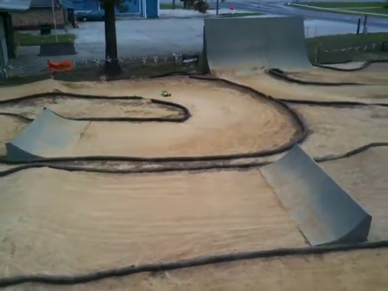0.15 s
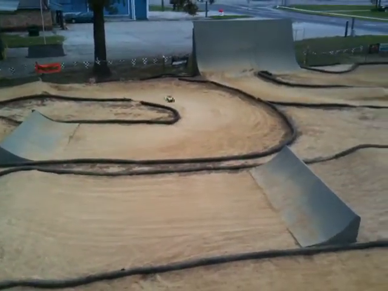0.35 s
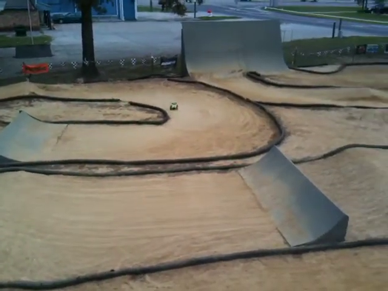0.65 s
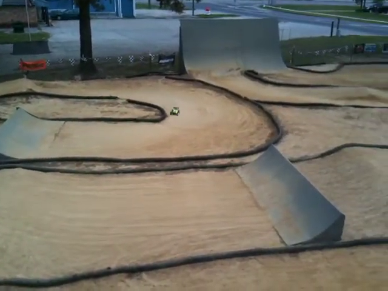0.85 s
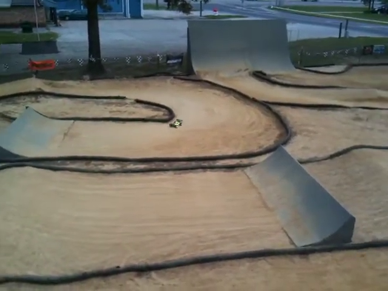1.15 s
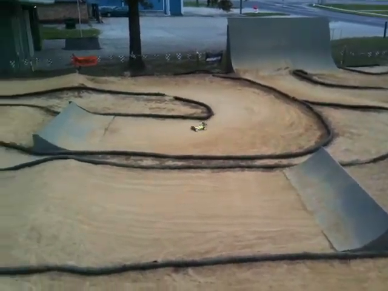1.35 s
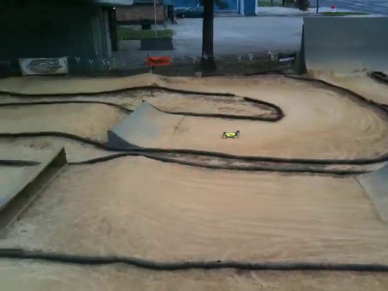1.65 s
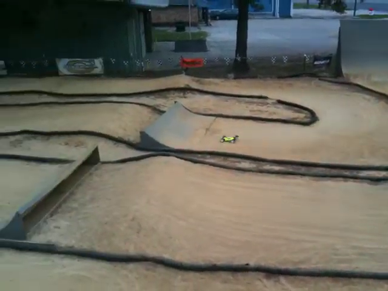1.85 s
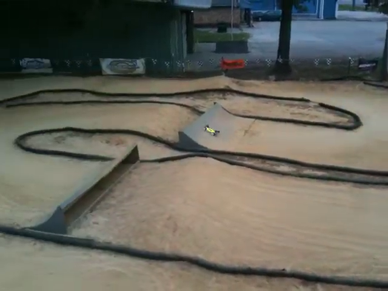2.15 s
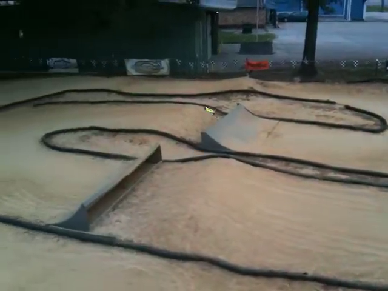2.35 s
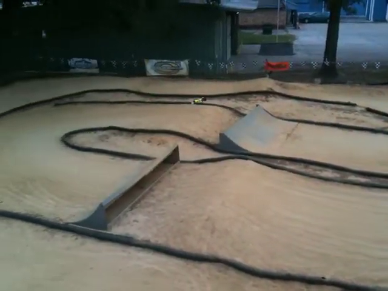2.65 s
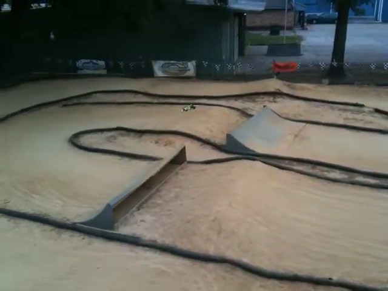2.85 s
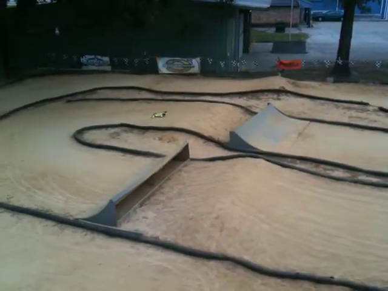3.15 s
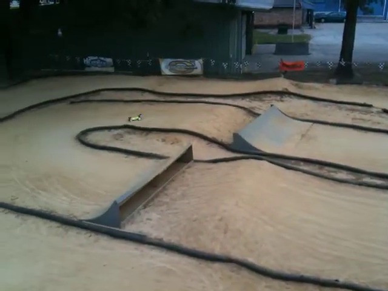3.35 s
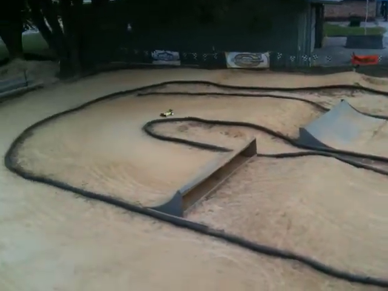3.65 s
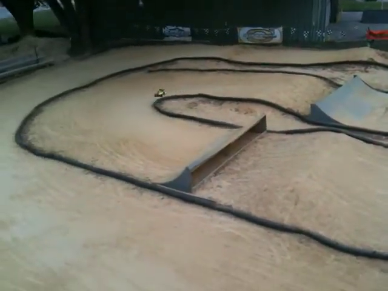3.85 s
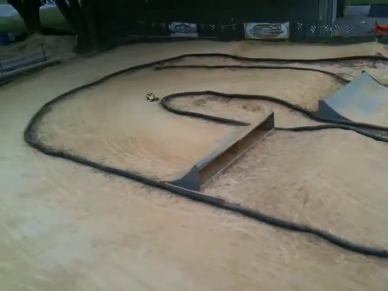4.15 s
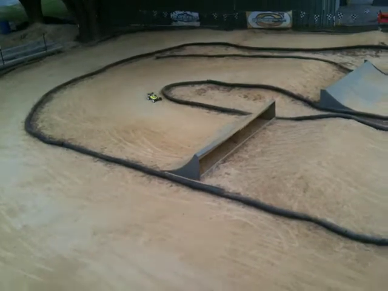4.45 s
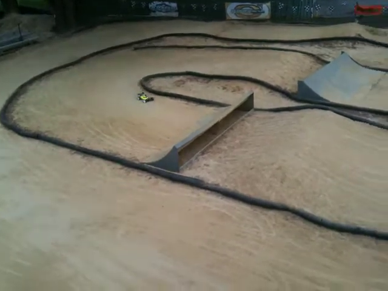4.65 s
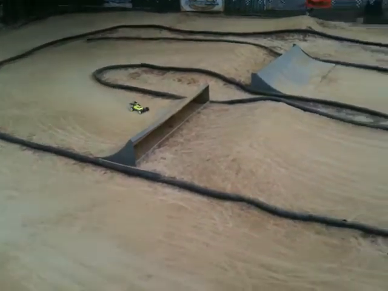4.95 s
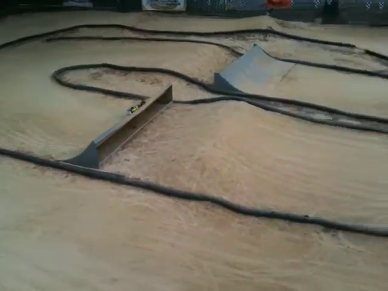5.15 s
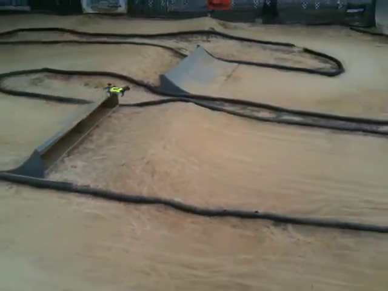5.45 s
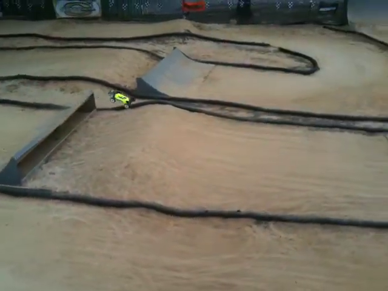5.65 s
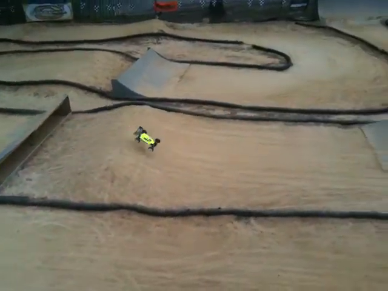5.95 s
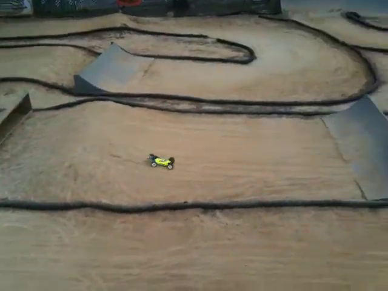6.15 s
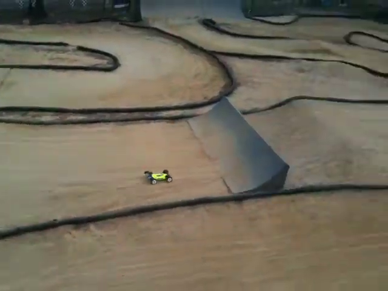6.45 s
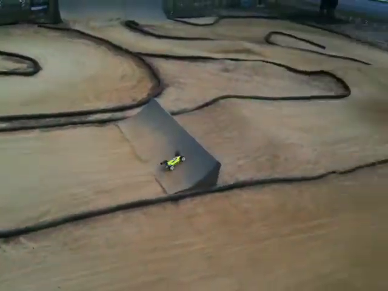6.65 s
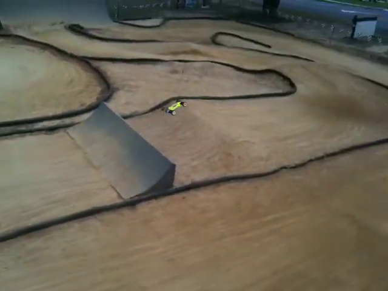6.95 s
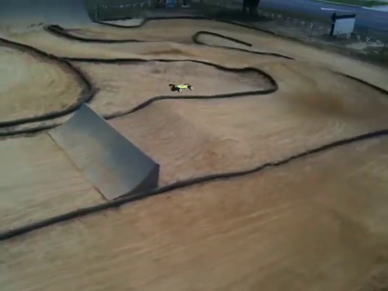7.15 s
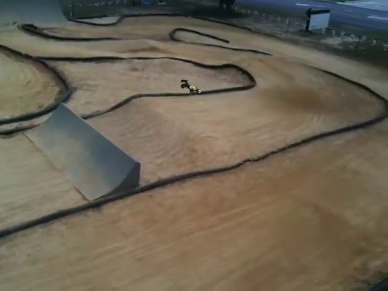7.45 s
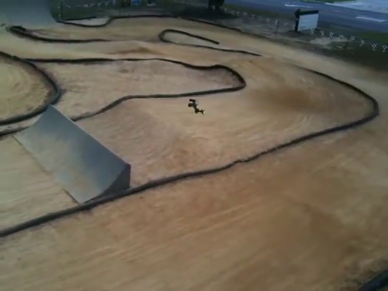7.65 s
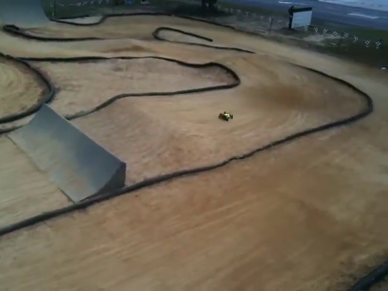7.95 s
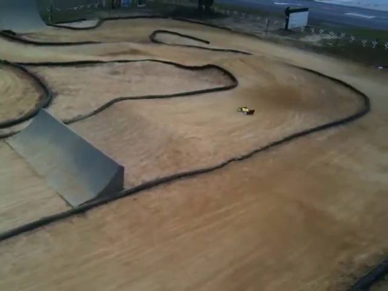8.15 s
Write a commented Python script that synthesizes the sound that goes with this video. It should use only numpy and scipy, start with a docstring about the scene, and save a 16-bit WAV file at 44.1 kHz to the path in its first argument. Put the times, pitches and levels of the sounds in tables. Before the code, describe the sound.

A small electric remote-control buggy buzzes and rasps in throttle bursts, clattering over jumps as wind puffs on the microphone.

```python
"""Electric buggy on a dirt track

A small buggy laps a track. With each squeeze of the throttle its gear teeth drive the chassis
resonances into a growl and a rasp; a faint, very high whine near 15 kHz follows the rasp. The motor
squeals on short blips and the body clatters over ramps. Gusts puff on the microphone, a thin, faint
whistle near 4.5 kHz swells twice, and far traffic hums."""
import sys
import numpy as np
from scipy import signal
from scipy.fft import rfft, irfft, next_fast_len
from scipy.io import wavfile
from scipy.ndimage import uniform_filter1d, map_coordinates

SR = 44100
rng = np.random.default_rng(int(sys.argv[2]) if len(sys.argv) > 2 else 0)


def master_out(mix):
    """Clip the mix to full scale and print it as 16-bit PCM to the path in sys.argv[1]."""
    frames = np.transpose(np.atleast_2d(mix))
    ceiling = np.clip(frames, -1, 1)
    pcm = np.round(ceiling * 32767).astype(np.int16)
    wavfile.write(sys.argv[1], SR, pcm)


N = 366030

# gear noise between the resonances: (frequency [Hz], spectral level [dB])
GEAR_SPECTRUM = [(300, -40), (420, -5), (600, -12), (1500, -12), (2600, -16), (3200, -21), (8500, -22),
                 (11000, -23), (15500, -36)]
SPLIT_HZ = 2840  # growl below, rasp above


def drivetrain():
    """Forced vibration: uneven tooth impacts excite the chassis; wheels and ruts modulate the level."""
    # a faint, very high whine: (time [s], frequency [Hz], level relative to the rasp [dB])
    high_whine = [(0, 14900, -19), (3.2, 15400, -18), (4.2, 15000, -16), (5, 15350, -14),
                  (5.75, 15100, -10), (6.5, 14900, -22), (7.27, 15550, -10), (7.5, 15000, -13),
                  (7.9, 14550, -16), (8.3, 14600, -22)]
    slack_db, loaded_db = -62, -54  # rasp levels between which the body starts to ring
    rasp_level, growl_level = throttle()
    hard_strike = rng.random(N) < .05
    teeth = np.where(hard_strike, amp(3.6 * rng.standard_normal(N)), 1)
    shake_db = 0.52 * wobble(35) + 1.13 * wobble(90)
    grind = teeth * patchy(depth_db=3)
    growl, ringing = chassis(grind)
    load = np.clip(np.log(rasp_level / amp(slack_db) + 1e-9) / np.log(amp(loaded_db - slack_db)), 0, 1)
    hiss = unit(filtered(grind, lambda hz: along(GEAR_SPECTRUM, hz) * (hz >= SPLIT_HZ)))
    rasp = load * ringing + (1 - load) * hiss  # slack gears only hiss
    whine_hz, whine_db = curves(high_whine)
    whine = unit(wobble(900) * amp(1.3 * wobble(25))) * tone(whine_hz)
    whine *= amp(whine_db + 1.6 * wobble(12))
    return amp(shake_db) * (rasp_level * (rasp + whine) + growl_level * growl)


def throttle():
    """Gear noise grows with load: rasp and growl envelopes rise, hold, drop at lift-off and coast."""
    # (on [s], off [s], first rasp level [dB], level at lift-off [dB], growl relative to rasp [dB])
    squeezes = [(0, 0.205, -57, -56, -1.5), (0.194, 0.476, -46.5, -49, 0), (0.641, 0.787, -49, -46.5, -1),
                (1.093, 1.197, -54, -54, 2), (1.292, 1.394, -53, -52.5, 5), (1.444, 1.793, -52.5, -54, 4),
                (1.75, 2.17, -48, -48.5, 4.5), (2.659, 2.746, -50.5, -51, 2), (2.88, 3.042, -51, -53, 0.5),
                (3.07, 3.26, -45.5, -52.5, 6), (3.695, 3.977, -53.5, -59, 0), (3.942, 4.25, -53.5, -48, 1),
                (4.198, 4.843, -48, -50, 3.5), (4.822, 5.145, -46.5, -48.5, 5.5), (5.2, 5.362, -54, -56, 4),
                (5.668, 5.742, -56, -51.5, 2.5), (5.863, 5.982, -61, -58, 9), (5.986, 6.558, -43, -41, 3),
                (6.67, 6.839, -50, -52, 5.5), (7.214, 7.276, -50, -48.5, 0.5),
                (7.372, 7.825, -59.5, -47.5, -1), (7.825, 8.14, -40, -44.5, 0), (8.203, 8.3, -58, -62, 8)]
    spin_up_s, spin_up_db = 0.056, 8.5
    lift_db_per_s, coast_db, coast_db_per_s = 150, -5.5, 43
    roll_db = -60.5  # growl while the wheels merely roll
    t = np.arange(0, N + 64, 64) / SR
    on, off, first_db, last_db, growl_db = np.transpose(squeezes)[..., None]
    held = np.clip((t - on - spin_up_s) / np.maximum(off - on - spin_up_s, .01), 0, 1)
    bite_db = spin_up_db * np.clip(1 - (t - on) / spin_up_s, 0, 1) * (on > 0)
    after = np.maximum(t - off, 0)
    fade_db = np.maximum(-lift_db_per_s * after, coast_db - coast_db_per_s * after)
    rasp = (t >= on) * amp(first_db + held * (last_db - first_db) - bite_db + fade_db)
    growl = np.maximum((rasp * amp(growl_db)).max(axis=0), amp(roll_db))
    return [np.interp(np.arange(N) / SR, t, level) for level in (rasp.max(axis=0), growl)]


def chassis(force):
    """Modal radiation: each side of the body has its own timbre. Returns the low and the high band."""
    # (frequency [Hz], bandwidth [Hz], level from nose [dB], flank [dB], quarter [dB], tail [dB])
    modes = [(430, 90, -25, -25, -25, -6.5), (931, 327, -3.5, 11, 4.5, -1), (1162, 410, -2, -2, 4, -8),
             (1714, 164, 0.5, -1, 5, -2.5), (1948, 315, 2.5, 6, 4.5, -10), (2264, 330, 2.5, 3.5, 0.5, -10),
             (2483, 250, -14, -16, 2, -5), (3160, 760, -10, -7.5, -26, -13.5),
             (3970, 440, -3.5, -6.5, -12.5, -9.5), (4700, 570, -11.5, -13, -10, -12),
             (5300, 340, -12, -7.5, -9.5, -32), (5980, 990, -8.5, -10, -12.5, -15),
             (6930, 290, -7, -7, -11, -7), (7440, 190, -12, -8.5, -18, -15),
             (7580, 350, -11.5, -11, -12, -11.5), (8230, 360, -20, -11, -17.5, -10),
             (9340, 1400, -14.5, -17, -17.5, -24)]
    # (time [s], side facing the listener [0 nose, 1 flank, 2 quarter, 3 tail])
    headings = [(0, 0), (.95, 0), (1.1, 1), (3.3, 1), (3.8, 2), (4.8, 2), (4.9, 1.4), (5.8, 2), (5.95, 3),
                (7.0, 3), (7.2, 2)]
    heading, = curves(headings)
    low, high = np.zeros(N), np.zeros(N)
    for side in range(4):
        def response(hz):
            power = sum(amp(2 * db[side]) / (1 + (2 * (hz - centre) / width) ** 2) ** 2
                        for centre, width, *db in modes)
            return np.sqrt(power + along(GEAR_SPECTRUM, hz) ** 2) * [hz < SPLIT_HZ, hz >= SPLIT_HZ]
        share = np.clip(1 - np.abs(heading - side), 0, 1)
        body = filtered(force, response)
        low += share * unit(body[0])
        high += share * unit(body[1])
    weave_m = .06
    heard = np.arange(N) + weave_m / 343 * SR * wobble(6)  # Doppler shift as the buggy weaves
    return [map_coordinates(band, [heard], mode='mirror') for band in (low, high)]


def squeals():
    """Frequency modulation: on throttle blips a fuzzy, fluttering tone glides with the motor's speed."""
    # (time [s], duration [s], start frequency [Hz], end frequency [Hz], level [dB])
    blips = [(1.104, 0.1, 6550, 7400, -53), (1.32, 0.066, 6700, 7900, -56), (1.87, 0.28, 5330, 5000, -53.5),
             (3.716, 0.064, 5400, 7200, -61), (3.759, .11, 7340, 7600, -56),
             (4.194, 0.124, 1800, 1687, -48), (4.655, 0.056, 2800, 2400, -50), (5.68, .11, 9900, 9800, -56),
             (6.304, 0.1, 1800, 1600, -40)]
    out = np.zeros(N + SR)
    fuzz = unit(wobble(600))
    flutter = .018 / 7000 * wobble(200)  # about 1.8 % at 7 kHz; high squeals flutter most
    for s, length, start_hz, end_hz, db in blips:
        at, n = round(s * SR), round(length * SR)
        hz = np.linspace(start_hz, end_hz, n)
        glide = tone(hz * (1 + hz * flutter[at:at + n]))
        out[at:at + n] += amp(db) * np.sqrt(np.hanning(n)) * glide
    return out[:N] * (.8 + .6 * fuzz)


def clatter():
    """Impact excitation: ramps and ruts make the plastic chassis rattle, ring and thud, then decay."""
    # (time [s], level [dB], relative thud level [dB], 60 dB decay time [s], ring frequency [Hz])
    blows = [(3.0833, -32.5, -17, 0.048, 7200), (3.115, -24, -18, 0.045, 4120),
             (3.1234, -29, -5, 0.058, 4080), (5.223, -32, -11, 0.038, 2600), (6.047, -28, -11, 0.052, 8220),
             (6.132, -27.5, 1.5, 0.066, 7000), (6.164, -24.5, -0.5, 0.088, 6200),
             (6.19, -21, -6, 0.045, 6950), (6.2544, -26.5, -11.5, 0.082, 8200),
             (6.713, -27.5, 11, 0.029, 2940), (6.744, -28.5, 3.5, 0.11, 2860),
             (6.794, -28, -1.5, 0.1, 7200), (7.2504, -35.5, -10, 0.076, 5800), (7.857, -30, -6, 0.21, 8100),
             (7.896, -16.5, 2, 0.066, 2970), (7.9187, -21, -18, 0.031, 6500)]
    # loose parts and the dull thud: (frequency [Hz], spectral level [dB])
    rattle_spectrum = [(1800, 8), (2600, 15), (4000, 7), (8000, 6), (12000, -35)]
    thud_spectrum = [(200, 4), (380, 2), (1000, 6), (2000, -2), (3200, -26)]
    rattle_db, body_db, ring_db = -11.5, -10.5, -8
    s, db, thud_db, t60, ring_hz = np.transpose(blows)
    fall = t60 / np.log(1000)
    rattle = amp(rattle_db) * coloured(rng.standard_normal(N), rattle_spectrum)
    body = amp(body_db) * chassis(rng.standard_normal(N))[1]
    latest_blow = np.maximum(np.searchsorted(s, np.arange(N) / SR) - 1, 0)
    ring = amp(ring_db) * unit(wobble(500)) * tone(ring_hz[latest_blow])
    thud = bursts(s, db + thud_db, 0.0043, fall) * coloured(rng.standard_normal(N), thud_spectrum)
    return bursts(s, db, 0.0017, fall) * (rattle + body + ring) + thud


def ticks():
    """Brief contacts have broad spectra: stones click on the shell and a loose part ticks thinly."""
    # strikes of each: (time [s], level [dB])
    pebbles = [(4.303, -39), (4.977, -45.5)]
    loose_part = [(2.2693, -42), (2.301, -39.5)]
    rise_s, fall_s = 0.00064, 0.01
    clicks = bursts(*np.transpose(pebbles), rise_s, fall_s / 2) * rng.standard_normal(N)
    thin = coloured(rng.standard_normal(N), [(3500, -16), (5400, -5), (6300, -11), (8000, -30)])
    return clicks + bursts(*np.transpose(loose_part), rise_s, fall_s) * thin


def gusts():
    """Turbulent pressure: eddies strike the microphone port as short, low puffs."""
    # (time [s], level [dB], width [s])
    puffs = [(0.515, -21.5, 0.0063), (0.533, -22, 0.0095), (0.573, -23, 0.015), (0.613, -16.5, 0.0075),
             (0.646, -28, 0.017), (.697, -29.5, 0.018), (.77, -38, 0.0058), (0.852, -30, 0.017),
             (0.97, -33.5, 0.013), (1.09, -22.5, 0.017), (2.309, -35, 0.02), (2.726, -20.5, 0.028),
             (2.765, -26.5, 0.018), (2.81, -26, 0.032), (2.85, -24.5, 0.0099), (2.874, -26, 0.029),
             (3.421, -31.5, 0.025), (3.442, -30.5, 0.037), (3.511, -29.5, 0.019), (3.577, -30.5, 0.0085),
             (3.596, -25.5, 0.017), (3.641, -26, .01), (3.722, -25.5, 0.019), (3.762, -31.5, .01),
             (3.802, -30, 0.031), (3.85, -27.5, 0.01), (3.882, -28.5, 0.015), (3.991, -31.5, 0.013),
             (4.056, -29.5, 0.017), (4.08, -32.5, 0.0048), (4.1, -25.5, 0.02), (4.174, -23, 0.0082),
             (4.198, -29, 0.021), (4.268, -27, 0.02), (5.198, -33, 0.035), (5.257, -31.5, 0.04),
             (5.798, -38.5, 0.06), (5.873, -32.5, 0.025), (6.749, -24, 0.023), (6.803, -27.5, 0.026),
             (6.862, -33.5, 0.064), (6.922, -27.5, 0.013), (6.984, -30, 0.013), (7.061, -30.5, 0.014),
             (7.085, -33, 0.0058), (7.124, -26, 0.0051), (7.144, -31, .006), (7.16, -26.5, 0.0099),
             (7.183, -31, .006), (7.204, -26, 0.0093), (7.224, -27.5, 0.012), (7.277, -29.5, 0.037),
             (7.291, -18.5, 0.0082), (7.315, -30, 0.043), (7.418, -33, .006), (7.438, -27.5, 0.016),
             (7.498, -33.5, 0.015), (7.528, -28.5, 0.028), (7.649, -31.5, 0.0072), (7.716, -22.5, 0.01),
             (7.736, -23, 0.011), (7.798, -23, 0.018), (7.832, -27.5, 0.02), (7.869, -23, 0.017),
             (7.96, -38.5, 0.03), (8.013, -29.5, 0.023), (8.164, -31.5, 0.012)]
    # crispness as the microphone turns across the wind: (time [s], edge relative to the puff [dB])
    crispness = [(.51, -18.5), (.535, -0.5), (.62, -22), (1.1, -20), (2.72, -5.5), (3.4, -41), (5.25, -7),
                 (5.9, -32), (6.72, 0.5), (6.95, -4), (7.13, -14.5), (7.29, 1.5), (7.45, -6.5),
                 (7.74, -4.5), (7.83, -7.5), (8.02, 0.5),]
    # a puff's body and its sharp edge: (frequency [Hz], spectral level [dB])
    eddy_spectrum = [(30, -40), (70, -19.5), (162, 4), (211, 0.5), (353, -7.5), (590, -21), (700, -29.5),
                     (910, -29.5), (1540, -120)]
    edge_spectrum = [(200, -11.5), (450, 4.5), (900, -6), (1600, -19), (3000, -54)]
    s, db, width = np.transpose(puffs)
    eddy = coloured(rng.standard_normal(N), eddy_spectrum)
    envelope = np.abs(signal.hilbert(eddy, next_fast_len(N))[:N])
    eddy = unit(eddy / envelope ** 0.28)  # a puff swings fully while it lasts
    edge = coloured(rng.standard_normal(N) * amp(3 * wobble(150)), edge_spectrum)
    crisp_db, = curves(crispness)
    thin = coloured(eddy, [(110, -11), (280, 0)])
    share = np.clip(amp(crisp_db), 0, 1) ** .5  # the crisper a puff, the less bass it has
    bodies = swells(s, db, width) * ((1 - share) * eddy + share * thin)
    edges = swells(s - 0.13 * width, db, 0.37 * width) * amp(crisp_db) * edge
    return (bodies + edges) * amp(1.5 * wobble(70))  # ragged flutter


def breeze():
    """Flow noise: air streaming over the microphone makes a lumpy rumble."""
    # (time [s], level [dB])
    strength = [(0, -44.5), (1.1, -46), (1.3, -49.5), (2.2, -51), (2.8, -46.5), (3.3, -52.5), (3.5, -42),
                (4.2, -36.5), (4.6, -52), (5.5, -60), (5.85, -52), (6.68, -54), (6.9, -44), (7.33, -41),
                (7.39, -55), (7.68, -53.5), (7.85, -36.5), (8.3, -51)]
    # (frequency [Hz], spectral level [dB])
    air_spectrum = [(30, -53), (70, -12.5), (150, 1.5), (250, -2), (400, -12), (700, -27.5), (1300, -120)]
    db, = curves(strength)
    return amp(db + 1.5 * wobble(16) + 2.2 * wobble(45)) * coloured(rng.standard_normal(N), air_spectrum)


def thin_whistle():
    """Amplitude modulation: a thin, faint whistle near 4.5 kHz swells twice."""
    # (time [s], frequency [Hz], level [dB])
    glide = [(3.53, 4220, -89), (3.62, 4470, -65.5), (3.87, 4660, -60), (3.97, 4690, -86),
             (6.78, 4620, -88), (6.86, 4580, -64), (7.2, 4480, -77)]
    hz, db = curves(glide)
    t = np.arange(N) / SR
    sounding = (t > glide[0][0]) & (t < glide[-1][0])
    return sounding * np.sqrt(2) * amp(db + 2.2 * wobble(46)) * tone(hz)


def traffic():
    """Beating: neighbouring harmonics of a far engine throb over the hush of road and trees."""
    # (time [s], level [dB])
    engine_levels = [(.6, -54), (1.2, -50), (3.3, -49.5), (5.7, -55), (6.2, -64)]
    # (multiple of the cycle rate, relative level [dB], fade once idling [dB/s])
    orders = [(11, 0, 9), (12, -1, -0.5), (18, -7, 2.5)]
    # (frequency [Hz], spectral level [dB])
    hush_spectrum = [(180, -24), (300, -4), (581, -6.5), (1120, -4.5), (1510, -4.5), (7140, -24.5),
                     (15500, -42.5)]
    engine_hz, idles_at_s, hush_db = 16.6, 3.95, -52
    engine_db, = curves(engine_levels)
    cycle_hz = engine_hz * (1 + 0.0037 * wobble(3.01))
    idle_s = np.maximum(np.arange(N) / SR - idles_at_s, 0)
    engine = sum(amp(level - fade * idle_s + 1.6 * wobble(5)) * tone(order * cycle_hz)
                 for order, level, fade in orders)
    hush = amp(hush_db + .9 * wobble(2.5)) * coloured(patchy(depth_db=-1.5), hush_spectrum)
    return hush + amp(engine_db) * engine


def amp(db):
    """Decibels to amplitude ratio."""
    return 10 ** (np.asarray(db) / 20)


def unit(x):
    """Normalisation to rms 1."""
    return x / np.sqrt(np.mean(x ** 2) + 1e-20)


def tone(hz):
    """A sinusoid whose phase is the integral of its frequency."""
    return np.sin(2 * np.pi * np.cumsum(hz) / SR)


def curves(rows):
    """Linear interpolation: one value per sample for each column after the time."""
    s, *cols = np.transpose(rows)
    return [np.interp(np.arange(N) / SR, s, c) for c in cols]


def filtered(x, response):
    """Linear filtering: the spectrum of x times a frequency response."""
    m = next_fast_len(N + 8192)
    return irfft(rfft(x, m) * response(np.fft.rfftfreq(m, 1 / SR)), m)[..., :N]


def along(points, hz):
    """Gain of (frequency [Hz], level [dB]) points joined on a logarithmic axis."""
    f, db = np.transpose(points)
    return amp(np.interp(np.log(hz + 1), np.log(f + 1), db))


def coloured(x, spectrum):
    """Spectral shaping of x, at rms 1."""
    return unit(filtered(x, lambda hz: along(spectrum, hz)))


def wobble(rate):
    """Smooth random modulation with rate knots a second."""
    return map_coordinates(rng.standard_normal(int(N * rate / SR) + 4), [np.arange(N) * rate / SR])


def patchy(depth_db):
    """White noise modulated in narrow, drawn-out streaks of frequency and time."""
    spectra = signal.stft(rng.standard_normal(N + 512), nperseg=512)[2]
    field = uniform_filter1d(rng.standard_normal(spectra.shape), size=2, axis=0)
    streaks = uniform_filter1d(field, size=14, axis=1)
    return signal.istft(spectra * amp(depth_db * unit(streaks)), nperseg=512)[1][:N]


def bursts(s, db, rise, fall):
    """Envelope of exponential bursts that add in power; rise and fall are time constants [s]."""
    power, t = np.zeros(N + SR), np.arange(SR // 4) / SR
    attack = (1 - np.exp(-t / rise)) ** 2
    for start, level, decay in np.broadcast(s, db, fall):
        power[round(start * SR):][:len(t)] += amp(2 * level) * attack * np.exp(-2 * t / max(decay, .001))
    return np.sqrt(power[:N])


def swells(s, db, width):
    """Envelope of bell-shaped swells that add in power, each quicker to rise than to fall."""
    power, t = np.zeros(N + SR), np.arange(-SR // 10, SR // 10) / SR
    for centre, level, span in zip(s, db, np.maximum(width, .003)):
        late = t + 0.2 * span
        spread = np.where(late < 0, .35, .65) * span
        power[round(centre * SR):][:len(t)] += amp(2 * level) * np.exp(-(late / spread) ** 2)
    return np.sqrt(power[SR // 10:][:N])


def scene():
    """Superposition of buggy, wind, thin whistle and road in one channel."""
    buggy = drivetrain() + squeals() + clatter() + ticks()
    return (buggy + gusts() + breeze() + thin_whistle() + traffic())[None]


def record(dry):
    """Band limiting: the microphone weakens the deep bass and passes nothing above its upper limit."""
    # (frequency [Hz], gain [dB])
    bass_rolloff = [(30, -17), (110, -1.5)]
    top_hz = 15800
    return filtered(dry, lambda hz: along(bass_rolloff, hz) * (hz < top_hz))


dry = scene()
out = record(dry)
master_out(out)
```